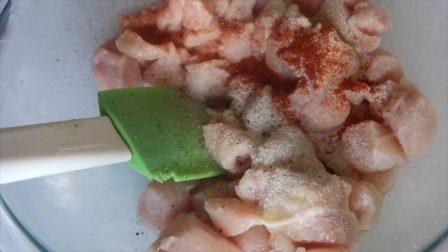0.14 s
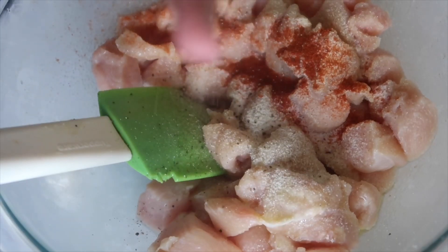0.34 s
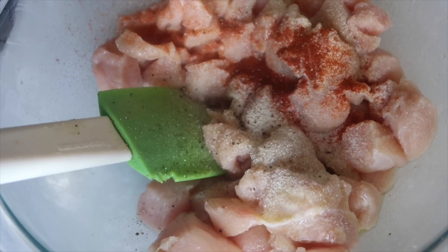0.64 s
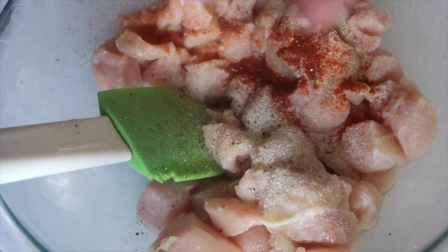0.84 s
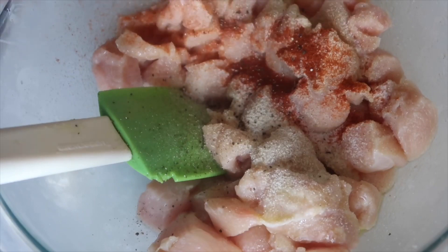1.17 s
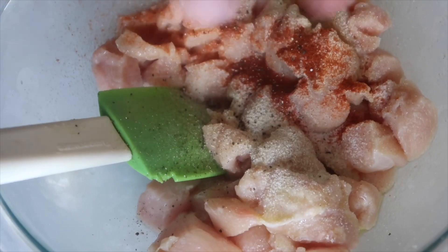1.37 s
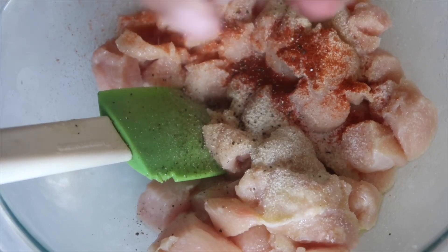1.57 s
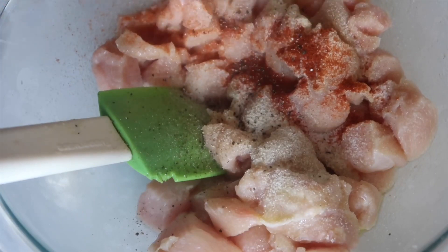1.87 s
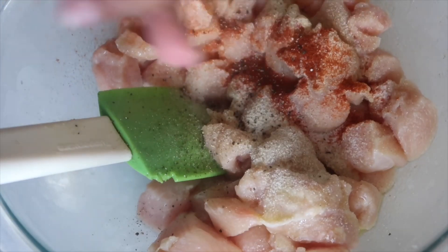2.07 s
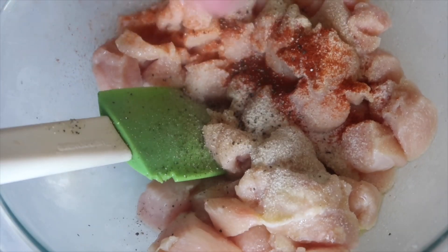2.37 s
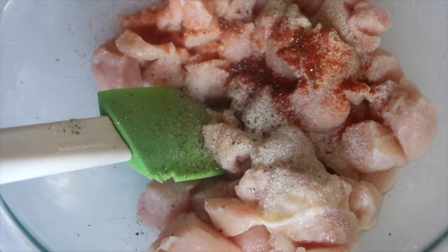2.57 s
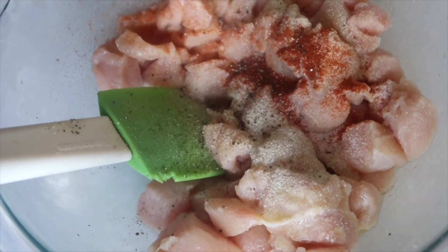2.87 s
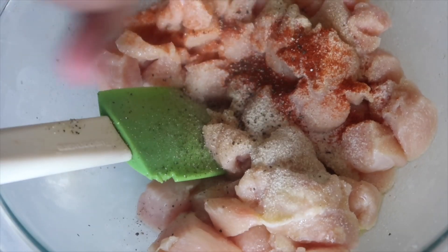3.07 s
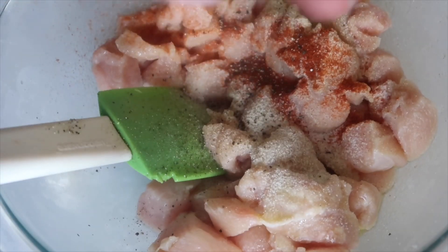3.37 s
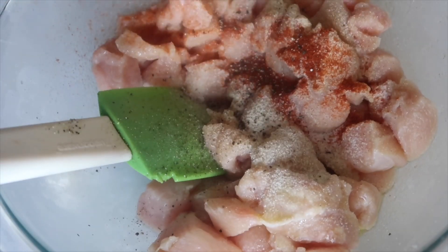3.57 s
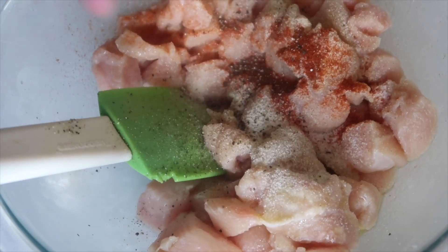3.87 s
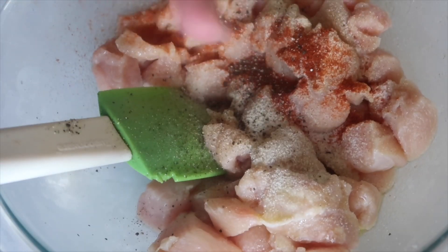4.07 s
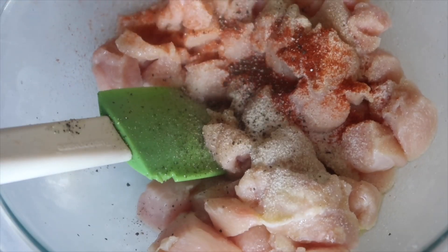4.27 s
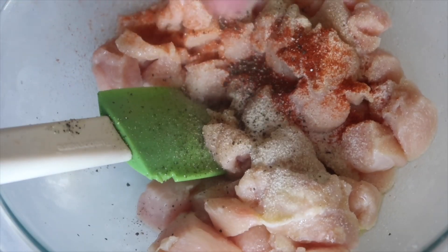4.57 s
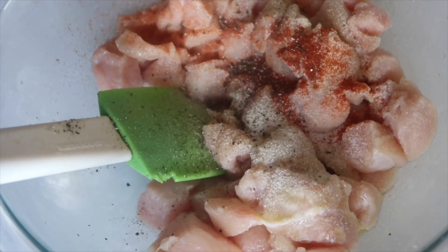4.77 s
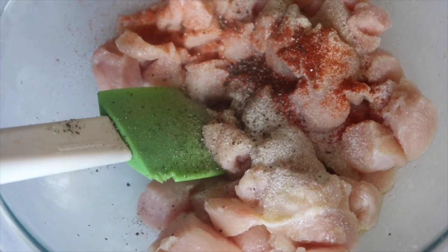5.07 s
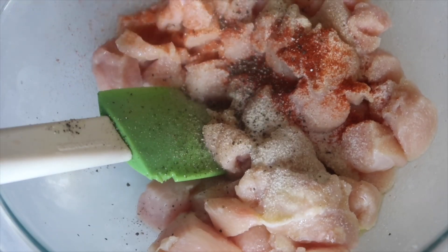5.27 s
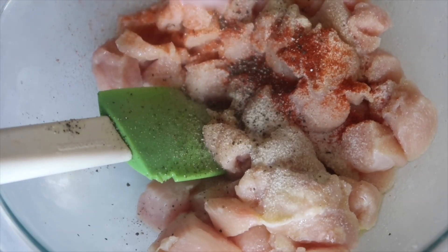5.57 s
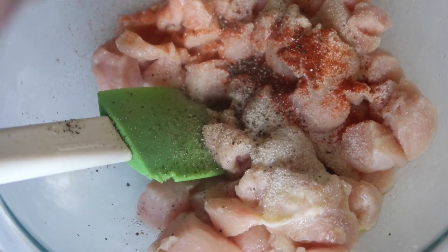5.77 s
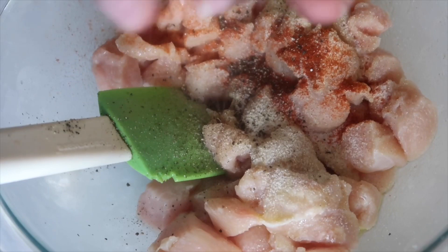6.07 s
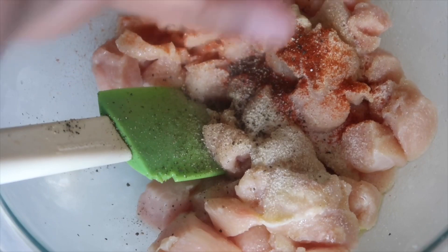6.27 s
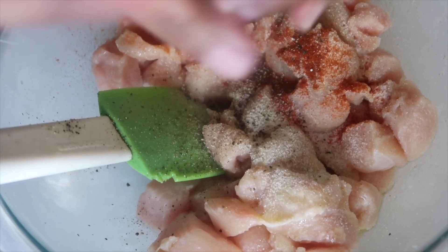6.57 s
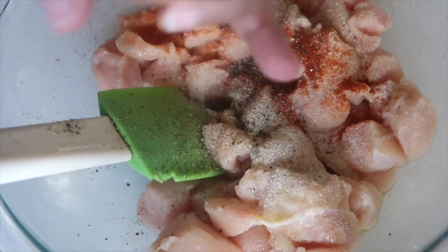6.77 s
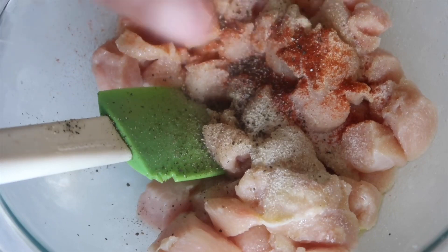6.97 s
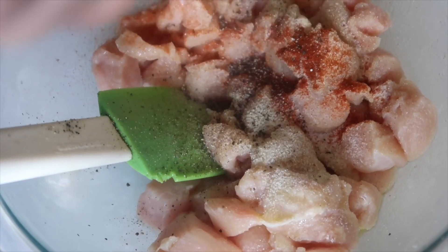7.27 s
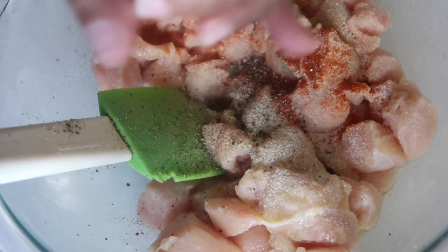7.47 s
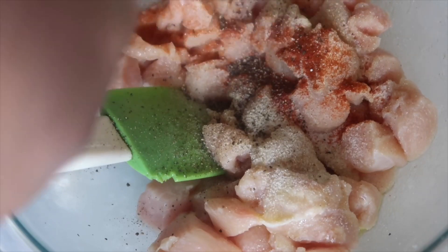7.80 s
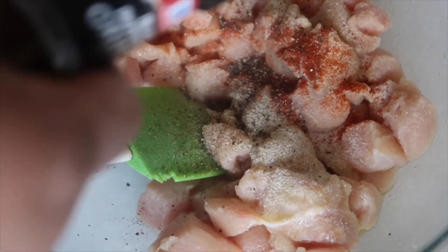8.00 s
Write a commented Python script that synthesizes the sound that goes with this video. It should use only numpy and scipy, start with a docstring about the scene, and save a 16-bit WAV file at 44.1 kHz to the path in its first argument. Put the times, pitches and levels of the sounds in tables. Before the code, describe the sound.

Peppercorns crack and crumble in a hand mill, heard very close and just right of centre. Each forward twist is a brief, dense crunch with hard clicks; return twists are much quieter rubbing. Pauses are longer around two to three seconds, then the strokes become more regular. Tiny thuds and skin swishes accompany them, over faint kitchen rumble, hiss and a wavering low hum.

```python
"""A pepper mill is twisted to and fro by hand over a glass bowl in a kitchen.
Each forward twist cracks peppercorns and crushes the pieces to a dense crunch; return twists are softer.
Random bursts of force ring the parts of the mill, and fading noise adds the echoes of bowl and room.
Soft thuds are short low resonances, and the swishes of a shifting hand are shaped noise.
Behind it all lie steady rumble and hiss, made of noise, and a low hum that swells and sinks."""
import sys
import numpy as np
from scipy import signal
from scipy.fft import rfft, irfft
from scipy.io import wavfile
from scipy.ndimage import uniform_filter1d

SR = 44100
rng = np.random.default_rng(int(sys.argv[2]) if len(sys.argv) > 2 else 0)


def generate_wav(signal):
    """Clip the signal to [-1, 1] and save it as 16-bit WAV at the path in sys.argv[1]."""
    frames = np.transpose(np.atleast_2d(signal))
    scaled = np.clip(frames, -1, 1) * 32767
    pcm = np.round(scaled).astype(np.int16)
    wavfile.write(sys.argv[1], SR, pcm)


N = 358974  # length in samples

# Forward twists. Each row: bite of the burr in seconds, length in seconds, place of the crest (0-1),
# level in dB, then shell, burr sizzle, hollow and grip thud in relative dB,
# take-up before the bite in seconds, take-up in relative dB, bite in relative dB.
TWISTS = [(0.0, 0.026, 0.85, -25, -1.5, 0, -11, -21.5, .03, -15, -6),
          (0.47, .138, 0, -27, -1, 0, -13, -17, 0.04, -14, -2),
          (1.005, .145, 0.18, -22.5, -8.5, -5, -10, -25.5, 0.026, -18.5, -7.5),
          (1.609, 0.058, 0.77, -21.5, -3, -2, -5.5, -22, 0.045, -18.5, -7),
          (2.475, .155, 0.63, -25.5, 1, 0, -15.5, -20.5, .085, -20, -6.5),
          (3.381, 0.16, 0.35, -30, 1.5, 1, -9.5, -17, 0.095, -13, -5.5),
          (4.098, 0.14, 0.68, -24, -1.5, -0.5, -12, -17.5, 0.069, -19.5, -6),
          (4.736, .148, 0.73, -27.5, -2, -0.5, -12, -21.5, 0.057, -23, -0.5),
          (5.558, 0.14, 0.54, -26.5, -1, -1.5, -12.5, -18, 0.098, -8.5, -0.5),
          (6.187, .118, 0.64, -22.5, -0.5, -0.5, -8, -21.5, 0.05, -22.5, -8),
          (6.979, 0.12, 0.31, -21.5, -2.5, -3, -21.5, -23, .1, -12.5, -5),
          (7.554, 0.12, 0.58, -21.5, -3, -3, -10.5, -25.5, 0.055, -27.5, -5.5)]
# Return twists. Each row: start in seconds, length in seconds, place of the crest (0-1),
# level in dB, then shell, burr sizzle, hollow and grip thud in relative dB.
RETURNS = [(0.144, 0.12, 0.26, -45.5, -3.5, -3, -9, -19), (0.715, 0.13, 0.5, -47, -0.5, 0.5, -7, -15),
           (1.289, .095, 0.4, -36.5, -5, -3.5, -9.5, -21), (1.865, 0.14, 0.4, -42.5, -2, -2.5, -4, -12),
           (3.65, 0.17, 0.67, -42.5, -3.5, -3.5, -10, -12.5), (4.404, .1, 0.35, -48, 2, -0.5, -6.5, -18),
           (5.02, .125, .5, -35.5, -5, -3.5, -9.5, -19), (5.832, 0.15, 0.7, -44, -3.5, -4.5, -6.5, -13.5),
           (6.479, 0.11, 0.7, -38.5, -8, -4, -7.5, -21.5), (7.25, 0.17, 0.76, -38.5, -5.5, -5.5, -6.5, -14)]
# Shape of a forward twist: the level jumps at the bite, arches over the crest, drops as the hand stops,
# and crumbs trickle on. Each name ends in its unit: s, dB or dB per second.
FORWARD = dict(attack_s=0.0025, last_db=-7.5, stop_s=0.023, stop_db=-12.5, trickle_db_per_s=133.5)
# Shape of a return twist, with names and units of the same kind.
BACKWARD = dict(attack_s=0.011, first_db=-4, last_db=-3, stop_s=0.0083, stop_db=-10, trickle_db_per_s=113)
# Whole peppercorns cracking or catching in the burr.
# Each row: start in seconds, base level in dB, sizzle in dB relative to it, pitch of the knock in Hz.
CRACKS = [(0.4748, -26, -4, 2380), (0.4805, -18, -2.5, 1550), (0.5174, -21.5, -12, 1700),
          (0.5325, -25, -20, 2640), (0.551, -15.5, -10.5, 1720), (0.5999, -26, 4, 1660),
          (0.72, -36.5, 0.5, 1740), (0.7567, -39.5, -16, 2650), (0.988, -36.5, -18, 2020),
          (1.042, -17, -7, 1930), (1.051, -25, 6, 2060), (1.0724, -27, 10.5, 2080), (1.0917, -22, 0, 1920),
          (1.1454, -18.5, -32.5, 1720), (1.175, -32, -8, 1650), (1.2993, -30, -8, 2020),
          (1.3496, -31, -8, 1860), (1.6077, -25.5, -5, 1980), (1.6417, -20, -10.5, 2100),
          (1.658, -32, 13, 2200), (1.6726, -12.5, -0.5, 2110), (1.7352, -28, -0.5, 1990),
          (1.9163, -35, -20, 1900), (1.9878, -32, 1, 2150), (2.4176, -41.5, 4.5, 2490),
          (2.4574, -28.5, 1.5, 2780), (2.5116, -18.5, -8, 2620), (2.5417, -11, -5.5, 2560),
          (2.6086, -14.5, -6, 1900), (2.888, -57.5, 8.5, 2320), (3.0522, -50, -14.5, 2685),
          (3.2978, -30, -4, 2370), (3.3351, -23, 2.5, 2750), (3.3758, -19, -2.5, 2800),
          (3.411, -16.5, -2, 2660), (3.423, -18.5, -6, 1630), (3.487, -27, -2, 3030),
          (3.526, -28.5, 3, 1790), (3.7946, -24.5, -7.5, 2700), (4.06, -33.5, -21.5, 2200),
          (4.1053, -23.5, -2, 1780), (4.151, -21, -2, 2800), (4.1785, -16, -12, 1920),
          (4.2011, -17.5, 0, 2680), (4.2181, -31.5, 13.5, 1930), (4.243, -13.5, -3, 2920),
          (4.4275, -36.5, -14, 2630), (4.6484, -44.5, -17, 2740), (4.739, -33, 8.5, 2500),
          (4.85, -21, -13, 1600), (5.0216, -36, -12, 1690), (5.0732, -29.5, -4, 1510),
          (5.5057, -27, -0.5, 2640), (5.5283, -26, -1.5, 2800), (5.586, -23, -14, 2350),
          (5.6099, -16, 2, 2380), (5.6177, -18, -1.5, 2950), (5.6372, -19.5, -1, 1820),
          (5.8721, -36, -9, 2110), (6.1504, -36, -2.5, 2930), (6.1902, -26, -1, 2420),
          (6.251, -17, -1, 3250), (6.339, -34.5, 2.5, 1730), (6.4415, -40.5, -5, 2040),
          (6.5252, -32, -12, 2100), (6.8822, -36.5, 2, 2250), (6.919, -21, 0.5, 1990),
          (6.937, -22, 0.5, 2240), (6.9781, -18, -10, 2050), (7.0031, -14.5, 0.5, 2220),
          (7.0583, -17, -14, 1810), (7.0665, -21.5, -26, 1600), (7.0878, -21.5, -24, 1660),
          (7.1096, -21.5, -3, 2420), (7.2386, -33, -9, 1640), (7.4105, -33, -14, 2060),
          (7.5243, -38, -2, 3000), (7.6625, -20, 2, 2230), (7.7137, -26, 1, 2120)]
# Low resonances of the mill's body. Each row: pitch in Hz, width in Hz, relative level in dB.
BODY = [(1400, 100, -6), (1535, 110, -.5), (1755, 80, -3), (2000, 120, .5), (2275, 100, -1.5)]
# Higher resonances of the mill's shell. Each row: pitch in Hz, width in Hz, relative level in dB.
SHELL = [(2600, 140, -3), (2770, 90, -4), (2895, 100, 0), (3210, 110, -4), (3500, 180, -7),
         (3850, 250, -10)]
# Well damped resonances of the hard burr. Each row: pitch in Hz, relative level in dB.
BURR = [(4350, 7), (4900, 4.5), (5550, 2), (6270, 1), (7050, 1.5), (7900, 0.5), (9050, 0), (10300, -2),
        (11600, -3)]
# Resonances of the air in the mill's mouth. Each row: pitch in Hz, width in Hz, relative level in dB.
HOLLOW = [(504, 490, -7.5), (646, 141, 4.5), (839, 122, 0.5), (1120, 270, -1.5)]
# Damped resonances of the mill in the hand. Each row: pitch in Hz, width in Hz, relative level in dB.
GRIP = [(85, 66, -0.5), (182, 430, -0.5), (342, 160, 2.5)]
# The mill jolts in the hand as a corn gives way. Each row: start in seconds, strength in relative dB.
JOLTS = [(0.488, -44.5), (0.556, -43.5), (1.677, -55), (2.514, -38), (2.545, -40.5), (3.38, -40),
         (3.413, -34.5), (4.17, -32), (6.254, -43)]
# Fingers sliding on the mill as the hand regrips. Each row: start in seconds, length in seconds, level in dB.
REGRIPS = [(0.867, 0.096, -56), (1.41, 0.09, -55), (2.199, 0.24, -63.5), (2.865, 0.073, -57),
           (2.943, 0.12, -60.5), (5.225, 0.29, -61.5), (5.405, 0.037, -47.5), (6.02, .06, -55),
           (6.663, 0.13, -57), (7.45, 0.086, -54), (8.024, 0.12, -54)]
# Colour of their rustle. Each row: frequency in Hz, relative level in dB per Hz.
RUSTLE = [(600, -12), (1400, -4), (2000, 1), (3000, 0), (5000, -4), (7300, -2), (8500, 5), (10000, -1),
          (12500, -5), (15000, -25)]
# Echoes of bowl and kitchen. Each row: frequency in Hz, time to fade by 60 dB in seconds, level in dB.
ROOM = [(200, 0.26, -7), (702, 0.057, -6.5), (1080, 0.17, -16), (1600, 0.36, -4.5), (2200, 0.18, -13),
        (3220, 0.14, -13.5), (5960, 0.25, -9), (12000, 0.03, -5.5)]
# Phase lead of the left microphone port; negative lags. Each row: frequency in Hz, phase in radians.
PORT_PHASE = [(50, 0), (3000, 0), (4500, -.2), (6000, -.45), (7500, -1.15), (9200, -1.8), (11000, -2.4),
              (13000, -2.9)]
# Stereo width of scattered sound. Each row: frequency in Hz, side relative to mid in dB.
WIDTH = [(50, -25), (120, -17), (280, -8), (700, -11), (1500, -8), (2500, -6), (4500, -2), (8000, 0)]
# Colour of the background rumble and hiss. Each row: frequency in Hz, relative level in dB per Hz.
FLOOR = [(25, -10.5), (50, -2), (115, -4.5), (170, -11.5), (270, -10.5), (400, -8.5), (700, -15.5),
         (1500, -18), (3000, -20.5), (6000, -25.5), (12000, -27.5), (14000, -44)]
# A low hum that swells and sinks. Each row: time in seconds, level in dB.
HUM = [(0, -101), (1.5, -60.5), (2.2, -59), (2.9, -82), (4.6, -64), (5.3, -54), (6.1, -64.5), (6.7, -54),
       (7.3, -64.5), (8.1, -55.5)]

RETURN_TAKE_UP_S, RETURN_TAKE_UP_DB = 0.046, -14
# while the burr takes up slack, the rubbing fades in and grows
TOUCH_S, TAKE_UP_GROWTH_DB = 0.077, 5.5
# the sizzle loses this much from the start to the end of a turn
DULLING_DB = 0.5
# pieces of a cracked corn add to the crunch: level relative to the crack, and time to fade by 60 dB
CRUMBLE_DB, CRUMBLE_T60_S = -9, 0.08
# lesser cracks: rate while the mill turns, level relative to the crunch, and spread
SMALL_CRACKS_PER_S, SMALL_CRACK_DB, SMALL_CRACK_SPREAD_DB = 16, -2.5, 3
# the hollow's answer to a crack of -25 dB, and the share of the crack's level that it follows
CRACK_HOLLOW_DB, CRACK_HOLLOW_FOLLOWS = -40.5, 0.83
FLOOR_DB = -57
CUTOFF_HZ = 15900


def stroke(start, length, crest, take_up_s, take_up_db, first_db, attack_s, last_db, stop_s, stop_db,
           trickle_db_per_s):
    """Gain over one turn of the hand: take-up, bite, arch, stop and trickle."""
    lead = max(take_up_s, attack_s)
    crest_s = np.clip(crest, 0, 1) * length
    knots_s = [-lead - TOUCH_S, -lead, -attack_s, 0, crest_s, length, length + stop_s]
    silent_db = -80
    knots_db = [silent_db, take_up_db - TAKE_UP_GROWTH_DB, take_up_db, first_db, 0, last_db, last_db + stop_db]
    first = max(int((start + knots_s[0]) * SR), 0)
    now = np.arange(first, min(int((start + 1) * SR), N))
    t = now / SR - start
    trickle_db = trickle_db_per_s * np.maximum(t - knots_s[-1], 0)
    gain = np.zeros(N)
    gain[now] = from_db(np.interp(t, knots_s, knots_db) - trickle_db)
    return gain


def grinding_db():
    """Level of the crunch: all turns of the hand, and the crumbs that each cracked corn leaves."""
    power = np.zeros(N)
    for s, length, crest, db, *_, lead_s, lead_db, bite_db in TWISTS:
        turn = stroke(s, length, crest, lead_s, lead_db, bite_db, **FORWARD)
        power += (from_db(db) * turn) ** 2
    for s, length, crest, db, *_ in RETURNS:
        turn = stroke(s, length, crest, RETURN_TAKE_UP_S, RETURN_TAKE_UP_DB, **BACKWARD)
        power += (from_db(db) * turn) ** 2
    crumbs = np.zeros(N)
    for s, db, *_ in CRACKS:
        crumbs[int(s * SR)] = from_db(db + CRUMBLE_DB) ** 2
    # the share of the crumbs' power left after each sample
    keep = from_db(-60 / (CRUMBLE_T60_S * SR)) ** 2
    return 10 * np.log10(power + signal.lfilter([1], [1, -keep], crumbs + 1e-18))


def grip_colour():
    """Shell, sizzle, hollow and thud in dB: set by the grip of each turn, with the sizzle dulling as it goes."""
    rows = []
    for s, length, _, _, shell, sizzle, hollow, thud, *_ in TWISTS + RETURNS:
        for done in (0, 1):
            dulled = sizzle + DULLING_DB * (.5 - done)
            rows.append((s + done * length, shell, dulled, hollow, thud))
    return in_time(sorted(rows))


def crunch(level_db, size_db=0.5, clump_hz=130, dust=.25, chips_db=-5):
    """Fragments break at random, in clumps, and more often the harder the twist; fine dust sizzles in the burr."""
    shell_db, sizzle_db, hollow_db, thud_db = grip_colour()
    effort = from_db((level_db - level_db.max()) / 2)
    born = rng.random(N) < (2000 + 1500 * effort) / SR  # breaks per second
    sizes = from_db(size_db * np.minimum(rng.exponential(1, N), 3.5)) * rng.choice([-1, 1], N)
    force = born * sizes + dust * rng.standard_normal(N)
    # the hand supplies its work evenly
    force /= np.sqrt(uniform_filter1d(force ** 2, size=300))
    clumps = np.minimum(rms_one(cut(rng.standard_normal(N), clump_hz, "low")), 2)
    clumping = from_db(1.3 * clumps)
    parts = mill(spray(force * clumping))
    # body, shell, burr, hollow and grip
    shares_db = (-3.3, shell_db - 3.5, sizzle_db - 2.0, hollow_db - 3.0, thud_db - 1.0)
    fine = sum(rms_one(part) * from_db(db) for part, db in zip(parts, shares_db))
    coarse = from_db(chips_db) * chips()
    return from_db(level_db) * (fine + coarse)


def chips(per_s=130, size_db=3.0, width_hz=450):
    """Coarse pieces snap one at a time, each ringing with a little knock at one of nine pitches."""
    born = rng.random(N) < per_s / SR
    sizes = from_db(size_db * np.minimum(rng.exponential(1, N), 2))
    clicks = born * sizes * rng.choice([-1, 1], N)
    pitches = np.geomspace(1450, 3300, num=9)
    dealt = rng.integers(0, len(pitches), N)
    knocks = sum(resonate(clicks * (dealt == k), [(hz, width_hz, 0)]) / hz for k, hz in enumerate(pitches))
    return rms_one(cut(cut(knocks, 1100, "high"), 5800, "low"))


def cracks(rows, jagged=0.46):
    """A corn splits in a few milliseconds of jagged snaps, which ring the mill and die away."""
    starts, level_db, sizzle_db, knock_hz = np.transpose(rows)
    hollow_db = CRACK_HOLLOW_DB + CRACK_HOLLOW_FOLLOWS * (level_db + 25) - level_db
    t = np.arange(SR // 20) / SR
    draws = rng.standard_normal((len(starts), 2, len(t)))
    snap_hz = rng.uniform(5500, 11000, len(starts))
    burst = np.exp(-(t / .0024) ** 2) + .18 * np.exp(-t / .007)
    force = spray(np.sign(draws[:, 0]) * np.exp(jagged * draws[:, 1]) * burst)
    body, shell, burr, hollow, _ = mill(force)
    blow = cut(cut(force, 1250, "high", order=4), 3800, "low")
    out = np.zeros((2, N + len(t)))
    for k, s in enumerate(starts):
        # the corn springs against the burr with a short knock of its own pitch
        spring = resonate(blow[:, k], [(knock_hz[k], 450, 3)])
        # the tooth that it breaks on favours one part of the treble
        snap = burr[:, k] + resonate(burr[:, k], [(snap_hz[k], 1400, 4)])
        parts = (spring + body[:, k] + shell[:, k], snap, hollow[:, k])
        at = max(int(s * SR), 0)
        for part, db in zip(parts, (1.3, sizzle_db[k], hollow_db[k])):
            # all the energy of the part, as if spread over 5 ms
            attack_rms = np.sqrt(np.sum(part ** 2) / 2 / (.005 * SR))
            out[:, at:at + len(t)] += part * from_db(level_db[k] + db) / attack_rms
    return out[:, :N]


def small_cracks(level_db, sizzle_db=-3, sizzle_spread_db=5):
    """Lesser cracks fall at random within each turn and follow its level; rows as in CRACKS."""
    rows = []
    for start, length, *_ in TWISTS + RETURNS:
        chances = rng.random((12, 3))
        sizes = rng.standard_normal((12, 2))
        for (chance, place, pitch), (size, bright) in zip(chances, sizes):
            if chance < SMALL_CRACKS_PER_S * length / len(chances):
                s = start + place * length
                db = level_db[int(s * SR)] + SMALL_CRACK_DB + SMALL_CRACK_SPREAD_DB * size
                knock_hz = 1550 * 2 ** pitch  # anywhere within an octave
                rows.append((s, db, sizzle_db + sizzle_spread_db * bright, knock_hz))
    return rows


def spray(force):
    """Each fracture throws its treble to one side at random, so the two channels differ."""
    aim = .65 * rng.choice([-1, 1], force.shape)
    side = cut(force * aim, 4200, "high", order=4)
    return np.array([force + side, force - side])


def mill(force):
    """A force rings body, shell, burr, hollow and grip, each in its own range of pitch."""
    body = cut(resonate(force, BODY), 1300, "high", order=4)
    shell = cut(resonate(force, SHELL), 3600, "high")
    burr = resonate(force, [(hz, hz / 11, db) for hz, db in BURR])
    burr = cut(cut(burr, 5100, "high"), 14000, "low", order=8)
    hollow = cut(resonate(force, HOLLOW), 1500, "low")
    grip = cut(resonate(force, GRIP), 500, "low")
    return body, shell, burr, hollow, grip


def jolts(hz=95, width_hz=45, soft_hz=220):
    """Each jolt is a single kick to a low resonance: a soft, quickly damped thud."""
    kicks = np.zeros(N)
    for s, db in JOLTS:
        # a narrow resonance needs a larger kick
        kicks[int(s * SR)] = from_db(db) * SR / (np.pi * width_hz)
    return cut(resonate(kicks, [(hz, width_hz, 3)]), soft_hz, "low")


def regrips(flicker_hz=60, flicker_db=3):
    """Skin slides over the mill in faint, uneven swishes of shaped noise."""
    t = np.arange(N) / SR
    swell = np.zeros(N)
    for s, length, db in REGRIPS:
        rise_and_fall = np.interp(t, [s, s + length / 2, s + length], [0, 1, 0]) ** .5
        swell += from_db(db) * rise_and_fall
    hz, noise = stereo_noise(N)
    rustle = irfft(noise * from_db(at_hz(RUSTLE, hz)), N)
    wobble = np.minimum(rms_one(cut(rng.standard_normal(N), flicker_hz, "low")), 2)
    return swell * rms_one(rustle * from_db(flicker_db * wobble))


def kitchen(x, first_echo_s=0.0039):
    """Direct sound at two microphone ports, and a tail of noise that fades at its own rate in each band."""
    t = np.arange(SR // 2) / SR
    hz, noise = stereo_noise(len(t))
    edges = np.geomspace(75, 19200, num=17)
    room = np.array(ROOM)
    t60_rows, level_rows = room[:, :2], room[:, ::2]
    echoes = 0
    for low, high in zip(edges, edges[1:]):
        centre = np.sqrt(low * high)
        decay = from_db(-60 * t / at_hz(t60_rows, centre)) * (t > first_echo_s)
        band = irfft(noise * ((hz >= low) & (hz < high)), len(t))
        echoes = echoes + band * decay / np.linalg.norm(decay) * from_db(at_hz(level_rows, centre))
    left, right = x
    phase = at_hz(PORT_PHASE, np.fft.rfftfreq(N, 1 / SR))
    direct = np.array([irfft(rfft(left) * np.exp(1j * phase), N), right])
    return direct + signal.fftconvolve(x, echoes, axes=1)[:, :N]


def background(hum_hz=116, hum_width_hz=35):
    """Rumble and faint hiss of the house from shaped noise, with a wavering hum from narrow noise."""
    hz, noise = stereo_noise(N)
    hum = rms_one(resonate(rng.standard_normal(N), [(hum_hz, hum_width_hz, 0)]))
    hum_db, = in_time(HUM)
    floor = rms_one(irfft(noise * from_db(at_hz(FLOOR, hz)), N))
    return from_db(FLOOR_DB) * floor + from_db(hum_db) * hum


def from_db(db):
    """Turn decibels into gain."""
    return 10 ** (np.asarray(db) / 20)


def rms_one(x):
    """Scale to an rms (average strength) of one."""
    return x / np.sqrt(np.mean(x ** 2) + 1e-20)


def in_time(rows):
    """Read each column of a table at every sample, by straight lines in time."""
    s, *columns = np.transpose(rows)
    return [np.interp(np.arange(N) / SR, s, c) for c in columns]


def at_hz(points, hz):
    """Read a table between its rows on a log-frequency axis."""
    known_hz, values = np.transpose(points)
    return np.interp(np.log(np.maximum(hz, 1)), np.log(known_hz), values)


def cut(x, hz, kind, order=2):
    """Butterworth filter: "low" keeps what lies below hz, "high" what lies above."""
    sos = signal.butter(order, np.clip(hz, 10, .45 * SR), kind, fs=SR, output="sos")
    return signal.sosfilt(sos, x + 1e-18)


def resonate(x, modes):
    """Ring side-by-side resonances with alternating signs; wider ones die away faster."""
    out = 0
    for k, (hz, width, db) in enumerate(modes):
        r = np.exp(-np.pi * width / SR)
        poles = [1, -2 * r * np.cos(2 * np.pi * hz / SR), r * r]
        gain = (-1) ** k * from_db(db) * (1 - r * r) / 2
        out = out + gain * signal.lfilter([1, 0, -1], poles, x + 1e-18)
    return out


def stereo_noise(size):
    """Spectra of two noises, alike in the bass and unrelated in the treble, with their frequencies."""
    hz = np.fft.rfftfreq(size, 1 / SR)
    mid, side = rfft(rng.standard_normal((2, size)))
    width = from_db(at_hz(WIDTH, hz))
    return hz, (mid + width * side * [[1], [-1]]) / np.sqrt(1 + width ** 2)


def scene():
    """The mill just right of centre, over the quiet of the kitchen."""
    pan = from_db([[-.3], [.3]])  # left, right
    level_db = grinding_db()
    grinding = crunch(level_db) + cracks(CRACKS + small_cracks(level_db)) + jolts()
    return kitchen(grinding) * pan + regrips() + background()


def record(dry):
    """Clip peaks beyond full scale, then filter off the highest treble."""
    top_cut = signal.ellip(8, .05, 60, CUTOFF_HZ, fs=SR, output="sos")
    return signal.sosfiltfilt(top_cut, np.clip(dry, -1, 1))


dry = scene()
out = record(dry)
generate_wav(out)
```